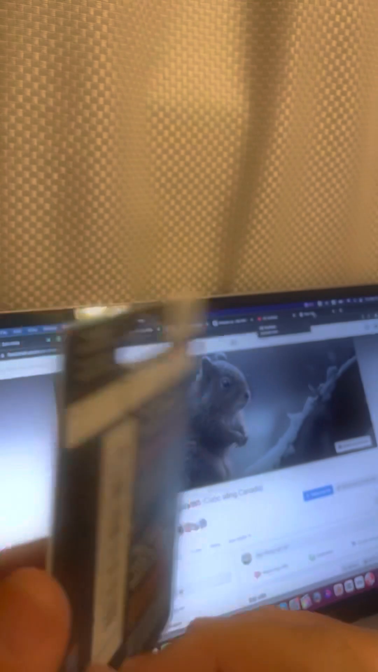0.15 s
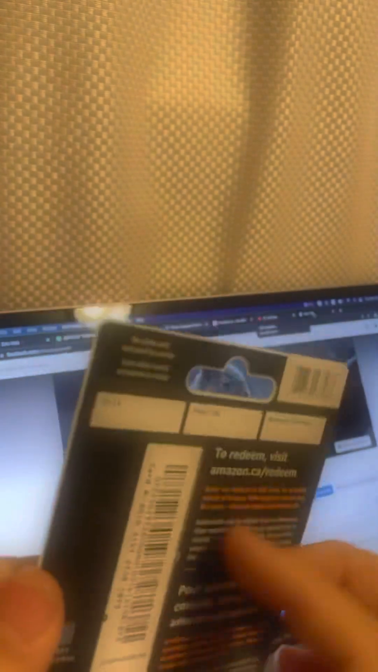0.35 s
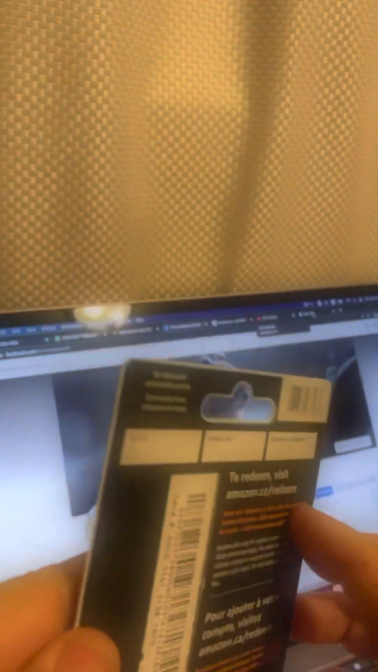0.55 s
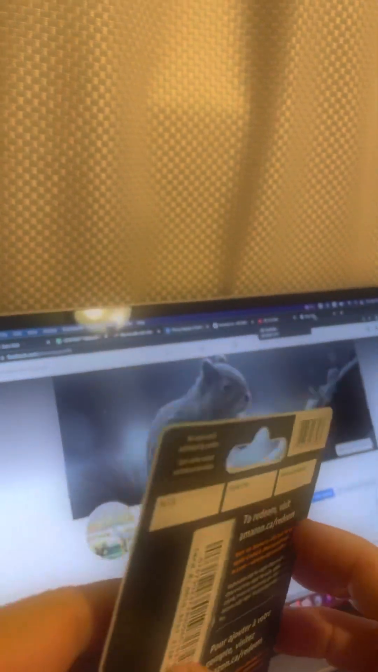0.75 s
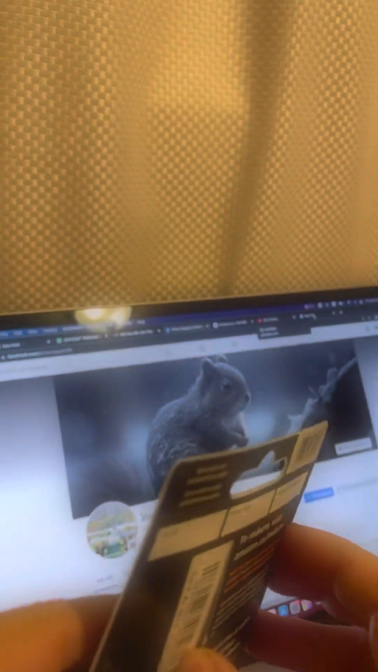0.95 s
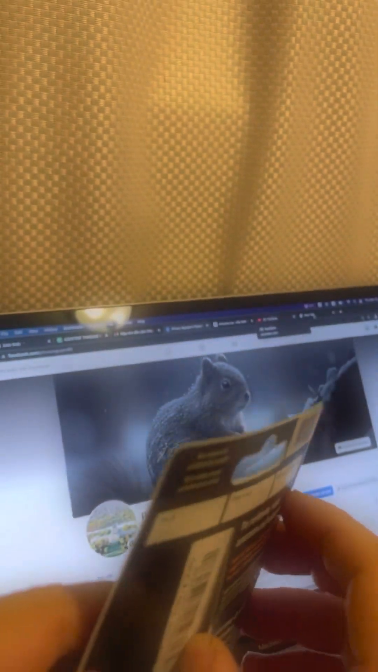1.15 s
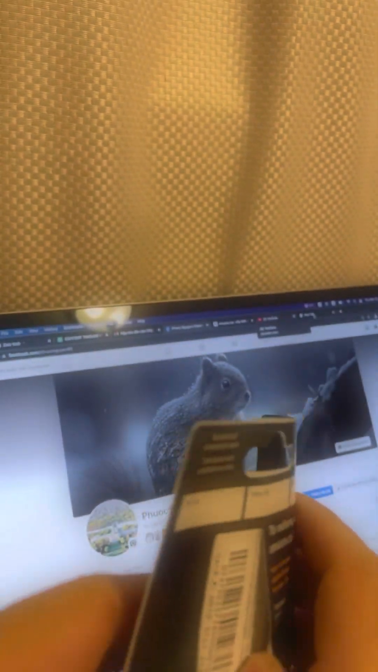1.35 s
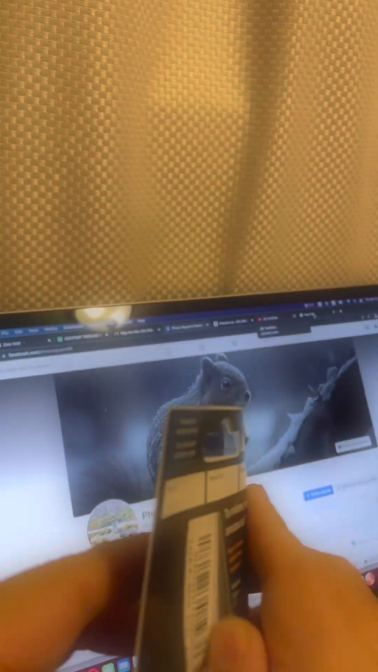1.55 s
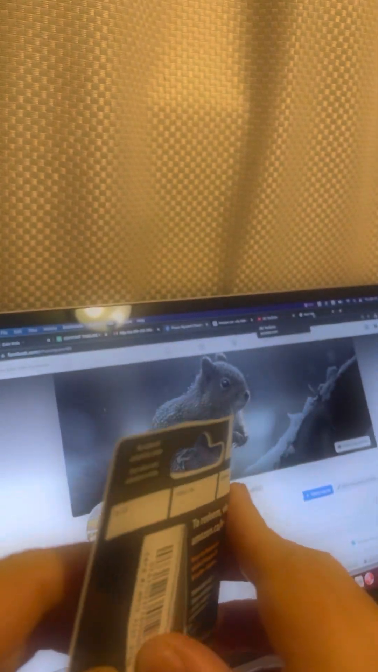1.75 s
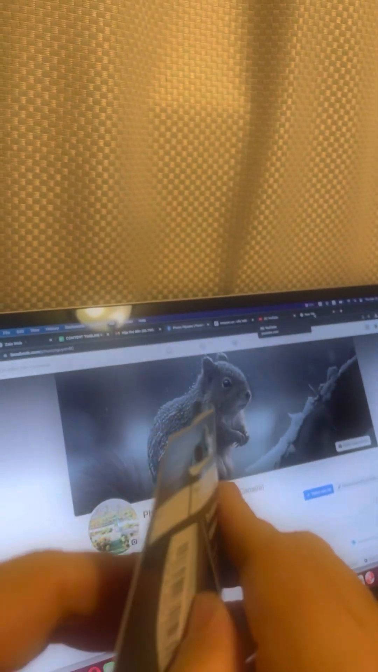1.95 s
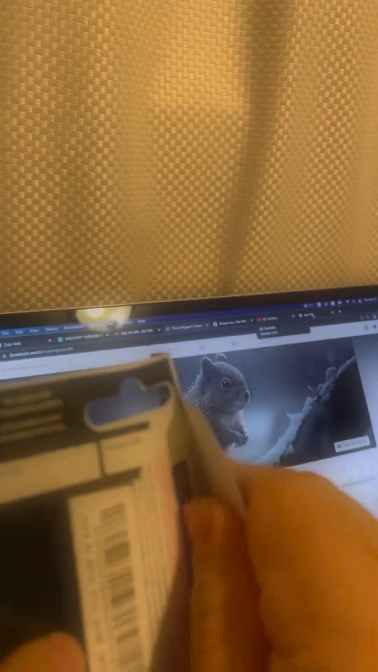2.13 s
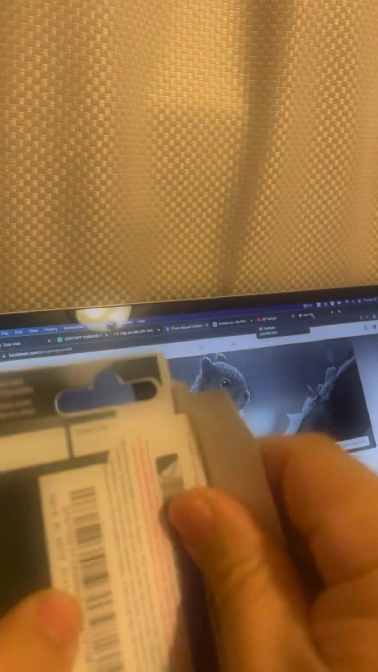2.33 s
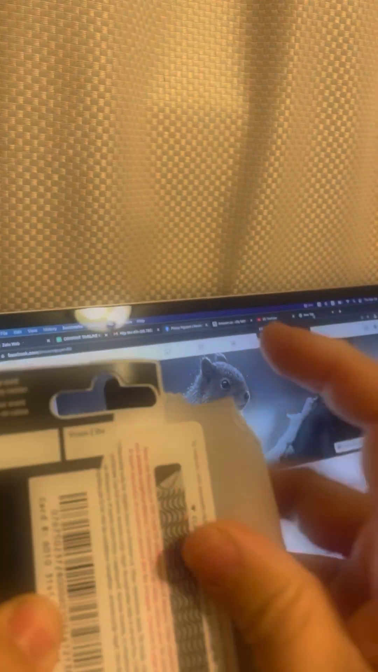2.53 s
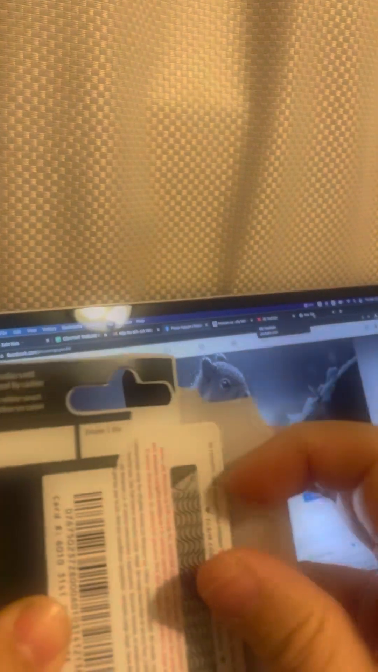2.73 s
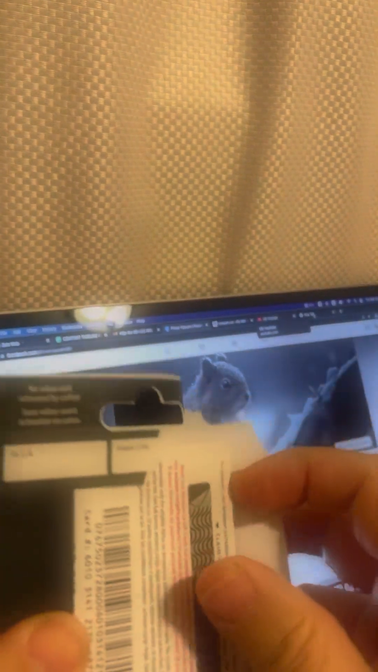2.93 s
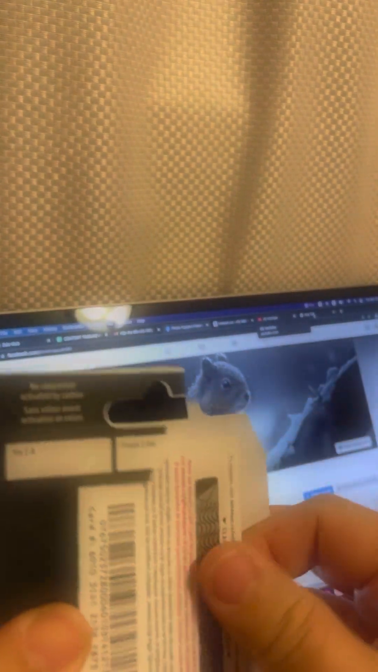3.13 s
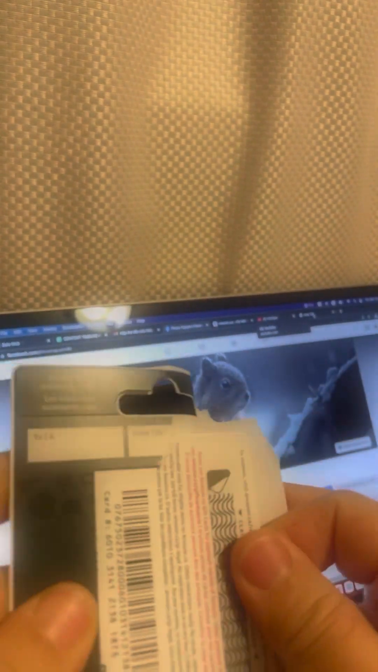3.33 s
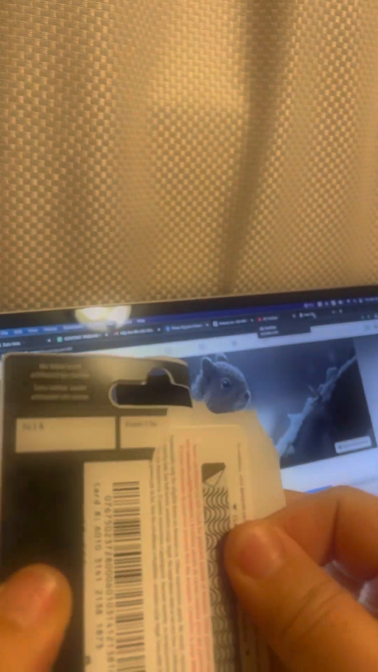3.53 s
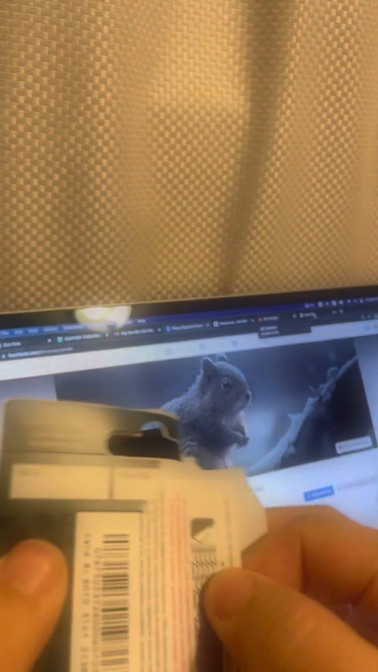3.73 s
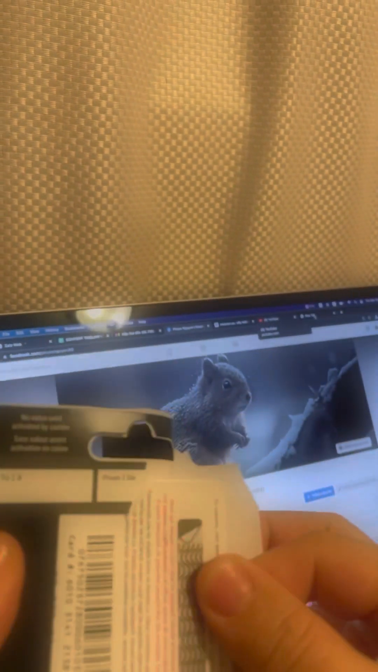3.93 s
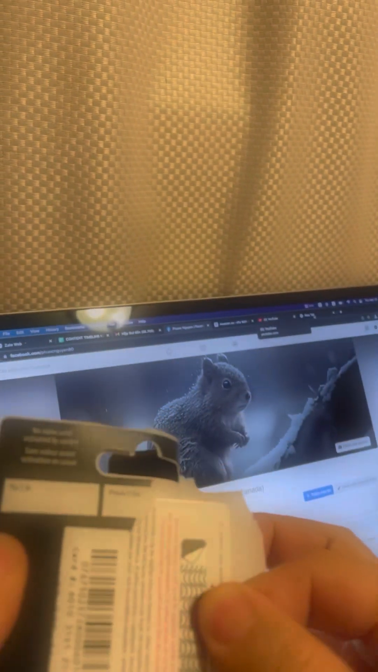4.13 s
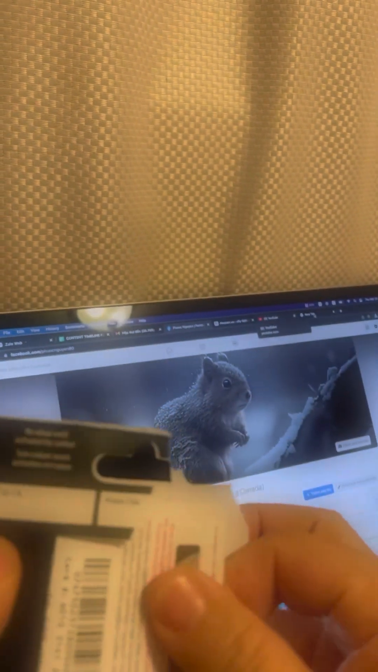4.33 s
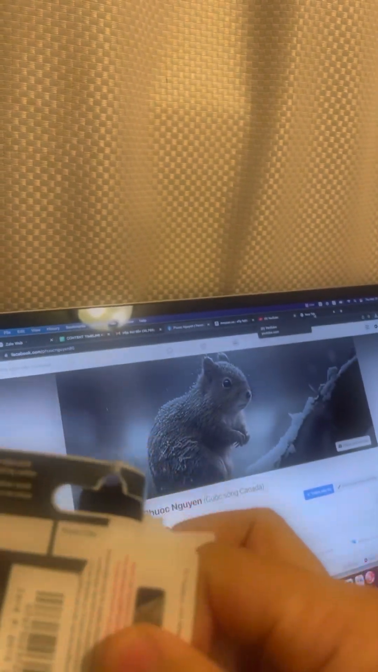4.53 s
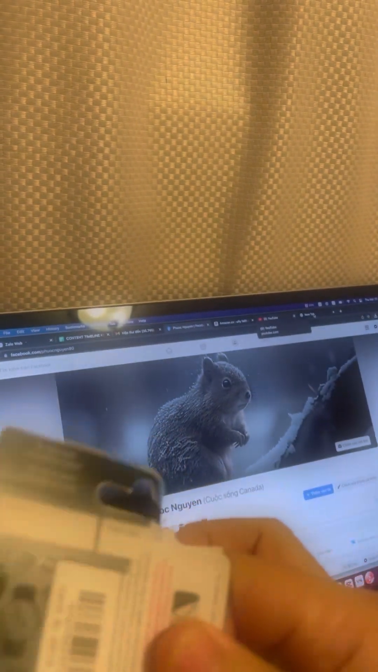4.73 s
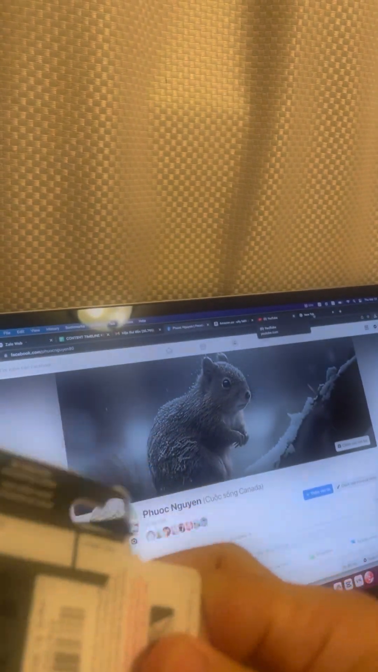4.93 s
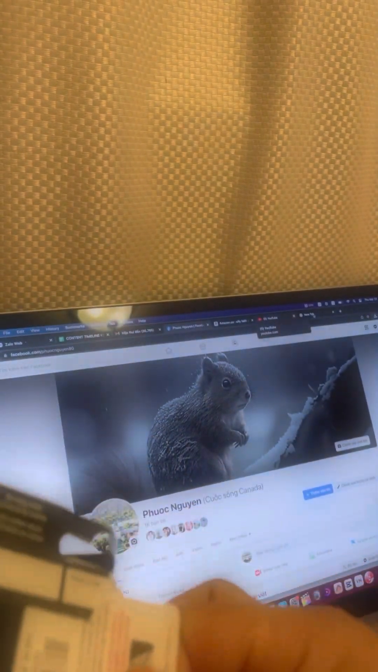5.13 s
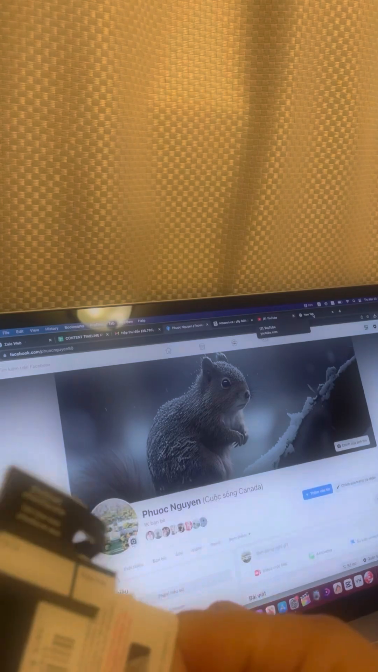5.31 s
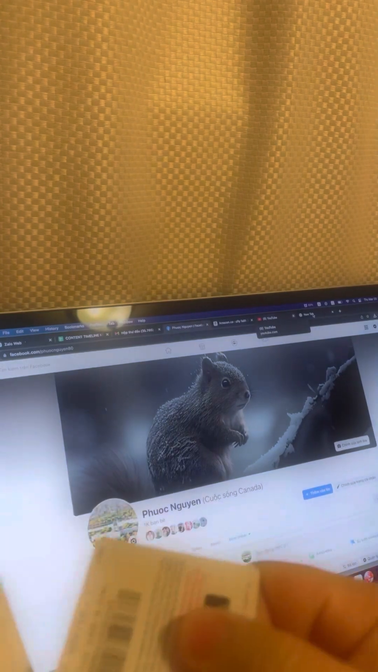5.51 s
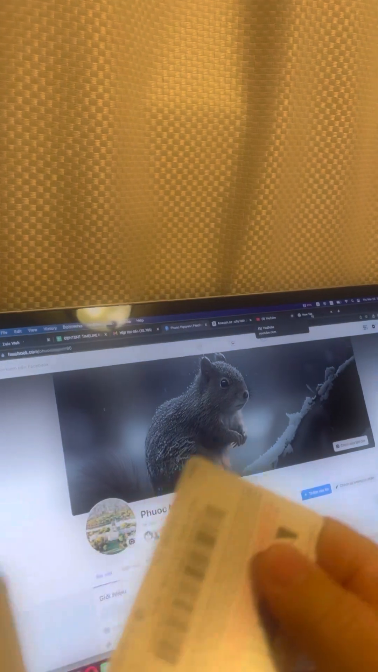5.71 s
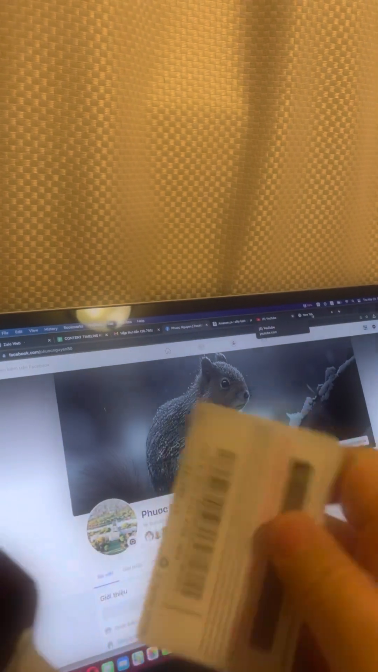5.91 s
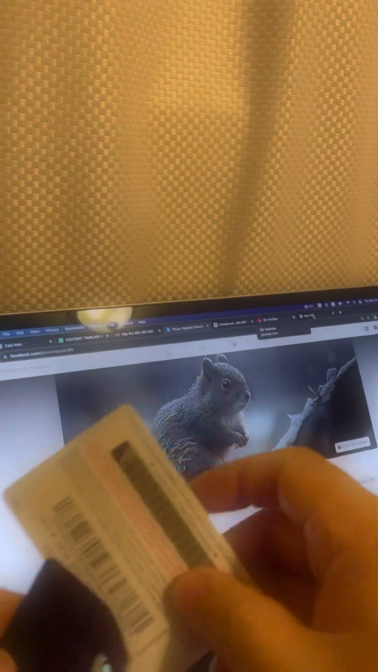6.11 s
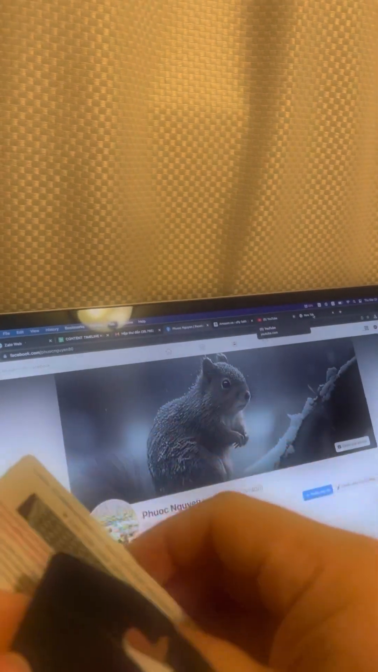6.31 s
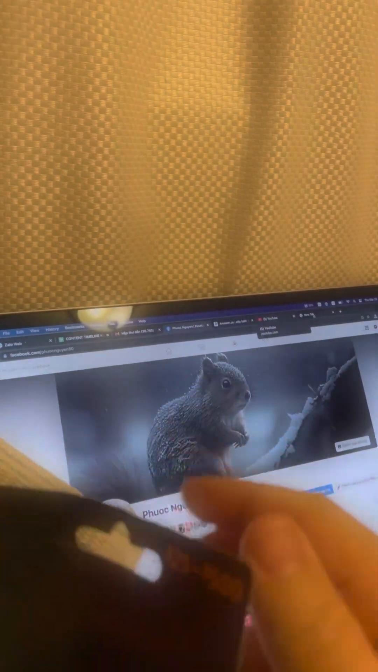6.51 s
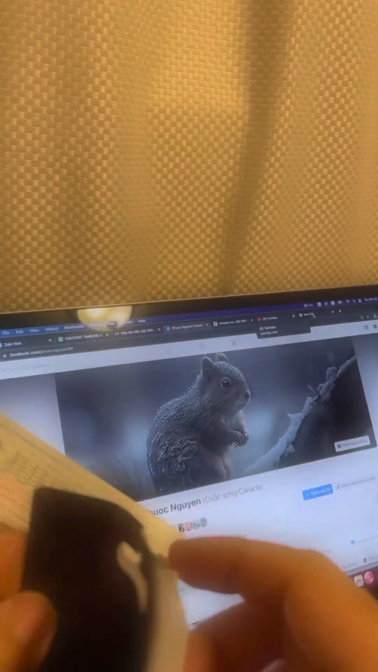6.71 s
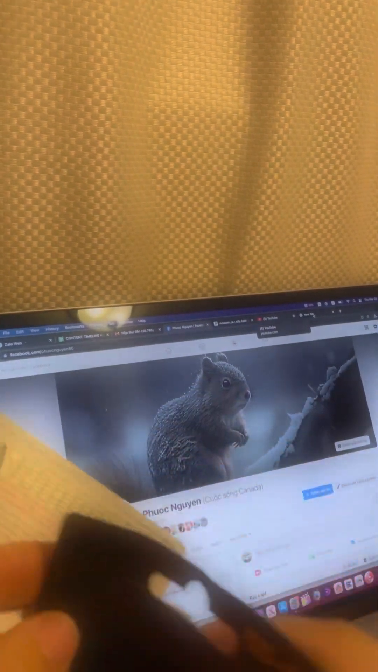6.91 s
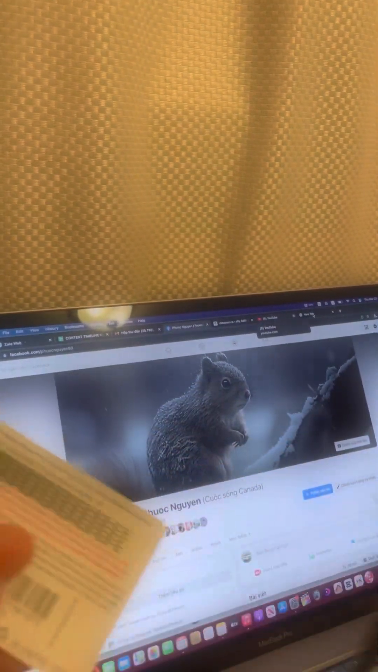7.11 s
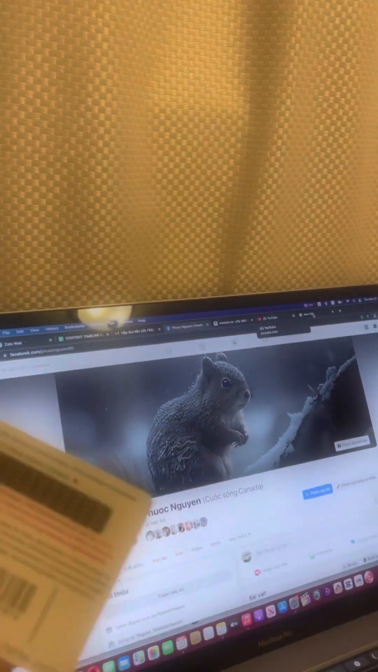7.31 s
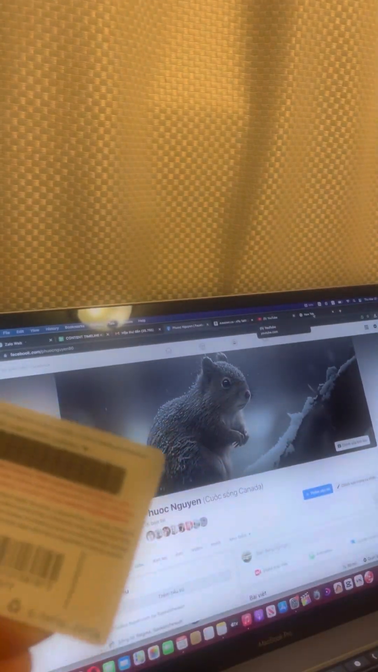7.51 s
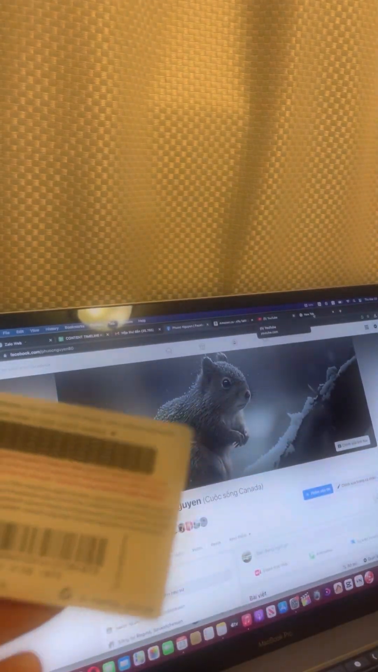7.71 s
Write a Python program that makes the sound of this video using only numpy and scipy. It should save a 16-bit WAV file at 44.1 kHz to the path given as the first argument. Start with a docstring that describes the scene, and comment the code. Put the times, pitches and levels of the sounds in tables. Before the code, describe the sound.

Stiff card packaging is opened by hand, heard very close and dry with faint room reflections. It starts with soft skin rubbing and a few light taps, then two sharp brittle rips in quick succession. Fiddly rubbing and small knocks lead to a moderate crack and finally a loud woody snap as the card comes loose, followed by hissy sliding and scattered clicks.

```python
"""Two hands tear open a stiff paperboard sleeve close to a phone, over the still air of a small room.
Fingers first rub (noise with stick-slip grip) and tap (bursts of fibre noise and ringing modes); the
sheet thumps and the board knocks (fluttering, damped sines). Near 2 s its glued seam gives way in two
rips of jerky crackle; a plastic card is worked loose, snaps free near 5.4 s in a burst of fibre noise
and slides off its backing. Noise echoes add laptop, desk and room; the phone's two ports hear it all."""
import sys
import numpy as np
from scipy import signal
from scipy.fft import rfft, irfft, next_fast_len
from scipy.io import wavfile
from scipy.ndimage import uniform_filter1d, map_coordinates

SR = 44100
rng = np.random.default_rng(int(sys.argv[2]) if len(sys.argv) > 2 else 0)


def file_out(sig):
    """Save sig as 16-bit WAV at sys.argv[1]."""
    # one column per channel
    cols = np.atleast_2d(sig).T
    # limit, then scale
    lim = np.clip(cols, -1, 1)
    pcm = np.round(lim * 32767).astype(np.int16)
    wavfile.write(sys.argv[1], SR, pcm)


N = 346626

# Colour of the still room air: (frequency [Hz], level [dB per Hz])
STILL_SPECTRUM = [(20, -9), (60, -4.5), (250, -6.5), (700, -19.5), (3000, -16), (16000, -20)]
# Colour of the hands' low rumble: (frequency [Hz], level [dB per Hz])
HANDS_SPECTRUM = [(20, -27), (45, 2.5), (80, -3.5), (140, -9.5), (260, -16.5), (700, -46.5)]
# Skin and card sliding on the board, one row a move, levels before the trims in sliding():
# (start [s], end [s], rub level [dB], hiss level [dB])
SLIDES = [(0.064, 0.2, -79, -66.5), (0.214, 0.276, -63.5, -57.5), (0.287, 0.414, -61, -55),
          (0.435, 0.53, -65, -59), (0.526, 0.612, -66, -68), (0.687, 0.825, -82, -77.5),
          (0.943, .96, -84, -81), (1.119, 1.392, -71, -66.5), (1.223, 1.332, -59.5, -57.5),
          (1.464, 1.693, -61, -56), (1.705, 1.846, -70, -70), (1.823, 1.94, -56.5, -60),
          (2.049, 2.19, -53.5, -54), (2.216, 2.41, -56, -65), (2.426, 2.49, -63.5, -71),
          (2.557, 2.648, -58, -68), (2.863, 2.882, -55, -59.5), (2.96, 3.097, -52.5, -70),
          (3.106, 3.27, -66, -70), (3.367, 3.464, -72, -74.5), (3.596, 3.771, -62, -60.5),
          (3.799, 3.84, -54, -61), (3.9, 3.993, -69.5, -72.5), (4.15, 4.262, -64, -66),
          (4.318, 4.358, -53.5, -57), (4.367, 4.454, -51.5, -54), (4.447, 4.58, -55, -56),
          (4.566, 4.713, -57, -60.5), (4.745, 4.808, -50, -58), (4.828, 4.885, -67.5, -69),
          (4.955, 5.161, -70, -68.5), (5.214, 5.419, -57.5, -58.5), (5.473, 5.638, -56.5, -48.5),
          (5.627, 5.706, -55.5, -53), (5.734, 5.885, -67, -65), (5.9, 6.028, -62, -57.5),
          (6.409, 6.469, -62.5, -59), (6.579, 6.738, -65, -56), (6.713, 6.785, -64.5, -63.5),
          (6.902, 6.997, -61.5, -61), (7.061, 7.26, -65, -60), (7.483, 7.539, -84, -69),
          (7.606, 7.682, -55, -59.5), (7.753, 7.782, -63.5, -61)]
# Colour of the rubbing: (frequency [Hz], level [dB per Hz])
RUB_SPECTRUM = [(300, -30), (750, -3.5), (1400, 4), (2100, 1.5), (3400, 2), (4600, -3.5), (7000, -17.5),
                (16000, -51)]
# Colour of the sliding hiss: (frequency [Hz], level [dB per Hz])
HISS_SPECTRUM = [(2000, -24.5), (4500, -5), (5600, -1), (7500, 1), (9800, -7.5), (12000, -2), (14000, -10),
                 (16000, -16.5)]
# Colour of the board drumming under the rub: (frequency [Hz], level [dB per Hz])
DRUM_SPECTRUM = [(70, -10), (170, -2), (300, 4.5), (470, -3.5), (600, 5), (800, -20), (1600, -30.5)]
# How differently the two ports hear the board: (frequency [Hz], relative amount [ratio])
PORT_CONTRAST = [(80, .05), (130, .6), (250, 1), (600, 1.5), (800, 1.5), (1300, .6), (2400, 1.4),
                 (4800, 1.3), (7000, .8), (14000, .6)]
# Colour of the laptop and desk reflections: (frequency [Hz], reflected level [dB])
DESK_COLOUR = [(100, -3.5), (400, 1), (780, 8.5), (1500, -19.5), (2800, 0), (4600, -6.5), (6500, -1.5),
               (10000, -44.5), (16000, -9)]
# Decay of the room: (frequency [Hz], t60 [s])
ROOM_T60 = [(150, 0.25), (1000, 0.76), (3000, 0.13), (8000, 0.13), (16000, 0.34)]
# Colour of the wall reflections: (frequency [Hz], reflected level [dB])
WALL_COLOUR = [(100, -3), (400, -5.5), (600, -4.5), (1100, -8), (2000, -1), (3200, 8.5), (7000, 6),
               (10000, -14), (16000, -7)]
# Fingers and card edges tapping the board, knock before the trim in contacts():
# (time [s], peak level [dB], brightness [dB per octave], knock level [dB])
TAPS = [(0.1083, -55, -2, -79), (0.2102, -39.5, 3, -40), (0.2175, -41.5, -8, -46),
        (0.2465, -41.5, -14, -45), (0.4979, -29, 2, -39), (0.6564, -52.5, -3, -59),
        (.819, -43.5, -3.5, -48), (1.612, -30.5, 3, -49), (1.6259, -33.5, 0, -45),
        (1.6634, -40.5, 0.5, -56.5), (2.136, -40, 3, -64), (2.1851, -37.5, -4, -43.5),
        (2.5486, -31, -8, -48), (2.6197, -45, -4, -58), (2.767, -42.5, 2.5, -51), (2.958, -49, 3, -53),
        (3.6318, -35, -10.5, -46.5), (3.7864, -45, 0, -53), (3.8484, -42.5, -3.5, -48.5),
        (3.9278, -47, -1, -80), (4.136, -40.5, -1.5, -51), (4.3251, -39, -22, -53), (4.381, -48, -20, -48),
        (4.4203, -40.5, -22, -38.5), (4.523, -40, 5, -59), (4.6114, -38, 4.5, -67),
        (4.6417, -38.5, -2, -41.5), (4.6957, -34.5, 2, -49.5), (4.8662, -45, 5.5, -80),
        (5.0606, -51, -5, -67.5), (5.5888, -33, 1.5, -38.5), (5.64, -31.5, 4, -48.5),
        (6.3072, -49.5, -5, -73.5), (6.4494, -28.5, 0, -44), (6.511, -38.5, -2.5, -64),
        (6.557, -42.5, -1.5, -40), (6.639, -41, -0.5, -52), (6.6743, -33.5, 3.5, -41),
        (6.682, -29.5, 2, -44.5), (6.75, -44.5, 3, -50.5), (6.871, -45.5, 4.5, -64), (6.9434, -42, -8, -37),
        (7.086, -42.5, 2, -58), (7.099, -60, -19, -39.5), (7.1541, -42.5, -3.5, -50.5),
        (7.2604, -39, -12.5, -56.5), (7.421, -47.5, -4.5, -79), (7.6138, -36.5, 3.5, -45.5),
        (7.625, -40.5, -2, -47.5), (7.6583, -39.5, 1, -50)]
# Glue and fibres giving way: (time [s], peak level [dB], t60 [s], brightness [dB per octave])
SNAPS = [(1.9892, -9, 0.026, 1), (2.0014, -16.5, 0.054, 4.5), (2.0164, -10.5, .012, 1.5),
         (2.0274, -10.5, 0.037, 0), (2.034, -13, 0.0076, -2.5), (2.2809, -22, .016, -0.5),
         (2.2849, -9.5, 0.014, 1), (2.3332, -14, 0.0088, 1.5), (2.3432, -22, 0.015, 2.5),
         (4.7302, -18.5, 0.012, -9.5), (4.7332, -17, 0.0063, 4.5), (4.7974, -24, 0.0085, 0.5),
         (5.3235, -30, 0.009, 0), (5.3291, -22, 0.021, 1), (5.3513, -30, 0.014, -1),
         (5.389, -23.5, 0.007, 1.5), (5.4123, -41.5, 0.035, 4.5), (5.4306, -19, 0.0064, -5.5),
         (5.4313, -11.5, 0.04, -0.5)]
# Colour of breaking fibres: (frequency [Hz], level [dB per Hz])
CRACK_SPECTRUM = [(100, -28), (300, -6), (490, -5.5), (620, -3), (780, -7), (1100, -0.5), (1900, 1.5),
                  (3400, -0.5), (4700, -4.5), (6200, -3), (9500, -5), (12500, -10), (16000, -23)]
# Bending modes of the board, before random detune and level scatter:
# (frequency [Hz], level [dB], t60 [s])
BOARD_MODES = [(185, -4, 0.032), (227, 2, 0.044), (308.7, 3.5, .045), (399, -8, 0.085), (556, -1.5, 0.069)]
# Low thumps of the flexing sheet and short, higher knocks of the struck board, level before the
# trim in thumps_and_knocks(): (time [s], level [dB], pitch [Hz])
THUMPS_AND_KNOCKS = [(.211, -36, 164), (.248, -45, 187), (0.498, -39, 106), (0.551, -48, 86),
                     (.821, -48, 527), (1.422, -42, 120), (1.587, -38.5, 105), (2.024, -18, 262),
                     (2.186, -37, 214), (2.289, -50, 113), (2.55, -32, 634), (2.89, -40, 332),
                     (2.957, -42, 297), (3.635, -44, 192.6), (3.852, -43.5, 68.2), (4.227, -35.5, 223),
                     (4.388, -47, 230), (4.423, -40.5, 196), (4.734, -22, 187.5), (4.731, -22.5, 77.6),
                     (4.955, -39.5, 87), (5.064, -48.5, 90), (5.441, -21, 78.4), (5.437, -27, 192),
                     (5.433, -11.5, 535), (5.604, -36, 115), (5.606, -35, 460), (6.454, -30, 302),
                     (6.556, -43, 202), (6.676, -54, 169), (6.883, -36.5, 66.2), (6.943, -44, 119),
                     (6.935, -45, 322), (6.963, -36, 78), (7.098, -36, 739), (7.1, -33.5, 106.8)]
# Rips and quick scrapes, level before the trim in strokes():
# (start [s], end [s], level [dB], brightness [dB per octave])
STROKES = [(0.809, 0.843, -52, 6), (1.447, 1.478, -46, 3.5), (1.965, 1.984, -37.5, 6.5),
           (1.981, 2.023, -27, 3), (2.02, 2.041, -21, -0.5), (2.031, 2.043, -35.5, -1.5),
           (2.276, 2.333, -28.5, -2), (2.325, 2.351, -18, 0.2), (2.492, 2.557, -43, 0.5),
           (2.689, 2.707, -40.5, 1), (2.971, 3.098, -40, 3.3), (4.214, 4.257, -48, -4.5),
           (4.703, 4.719, -37, 3), (4.721, 4.742, -28.5, 2.5), (4.769, 4.804, -55, -9),
           (5.321, 5.341, -36.5, 9), (5.395, 5.446, -35, 3), (5.424, 5.445, -41, 10),
           (5.441, 5.473, -36.5, -2), (5.463, 5.524, -36, 1), (5.587, 5.638, -47, -10.5),
           (6.151, 6.203, -55.5, 3), (7.161, 7.238, -45, 2)]
# Phase between the two microphone ports: (frequency [Hz], lead of the left port [rad])
PORT_PHASE = [(450, 0), (660, -.6), (850, .5), (1100, -.1), (2000, .15), (3500, .3), (4300, -.4),
              (4750, -1.9), (5300, 0), (7000, 1.35), (9400, 3.05), (11000, 3.25), (13000, 4.8),
              (14000, 6.2)]

# low rumble: level [dB] at a rub row of -60 dB, dB per dB of rub, inertia [s]
RUMBLE_DB, RUMBLE_FOLLOWS, RUMBLE_LAG_S = -63, 0.34, 0.17
# drumming board: level [dB] at a rub row of -60 dB, dB per dB of rub
DRUM_DB, DRUM_FOLLOWS = -65.5, .65
# fingers merely holding the board, before the trims in sliding()
GRIP_RUB_DB, GRIP_HISS_DB = -83, -87
# time to rise or fall by 20 dB [s]; drop from mid-move to its ends [dB]
SLIDE_ATTACK_S, SLIDE_RELEASE_S, SLIDE_ARCH_DB = 0.037, .045, 3
# faint ticks under sliding fingers: rate [per s], peak and knock over the rub row [dB]
TICKS_PER_S, TICK_DB, TICK_KNOCK_DB = 11, 2.5, -0.5
# their level scatter either way [dB] and brightness [dB per octave]
TICK_SCATTER_DB, TICK_TILT_DB = 5, -6
TAP_T60_S = .019
SNAP_KNOCK_DB = -26  # knock relative to the snap, before the trim in contacts()
# higher and louder thumps and knocks die sooner: t60 [s] at 100 Hz and a row level of -35 dB,
# power of the pitch, dB of t60 lost per dB of level
RING_T60_S, RING_PITCH_POWER, RING_GRIP = .115, 0.72, 0.19
TOP_HZ = 15900  # upper band edge of the phone


def amp(db):
    """Decibels as a linear gain."""
    return 10 ** (np.asarray(db) / 20)


def unit(x):
    """Scale a sound to rms 1."""
    return x / np.sqrt(np.mean(x ** 2) + 1e-20)


def along(points, hz):
    """Read a table of (frequency, value) on a log frequency axis."""
    f, v = np.transpose(points)
    return np.interp(np.log(hz + 1), np.log(f), v)


def random_curve(knots, position):
    """A smooth random curve through the given number of knots, read at knot positions."""
    return map_coordinates(rng.standard_normal(knots), [position])


def wobble(rate):
    """A smooth random curve over the whole scene, rate knots a second."""
    return random_curve(int(N * rate / SR) + 4, np.arange(N) * rate / SR)


def filtered(x, response):
    """Shape a sound with a response given as a function of frequency."""
    m = next_fast_len(N + SR // 2)
    hz = np.fft.rfftfreq(m, 1 / SR)
    return irfft(rfft(x, m) * response(hz), m)[..., :N]


def coloured(x, spectrum):
    """Give a sound the colour of a table, at rms 1."""
    return unit(filtered(x, lambda hz: amp(along(spectrum, hz))))


def add(track, s, sound):
    """Mix a sound into the stereo track at s seconds."""
    part = track[:, max(round(s * SR), 0):][:, :sound.shape[-1]]
    part += sound[..., :part.shape[-1]]


def fibres(size, scatter_db):
    """Dense tiny slips as noise at rms 1, most of them weak and a few strong."""
    strength = np.minimum(rng.exponential(size=size), 4)
    return unit(rng.standard_normal(size) * amp(scatter_db * strength))


def background(rub, still_db=-80):
    """The hands rumble faintly as they move, over the still air of the room."""
    effort_db = uniform_filter1d(rub, int(RUMBLE_LAG_S * SR)) + 60
    rumble_db = RUMBLE_DB + RUMBLE_FOLLOWS * effort_db
    rumble = amp(rumble_db) * coloured(rng.standard_normal(N), HANDS_SPECTRUM)
    still = amp(still_db) * coloured(rng.standard_normal(N), STILL_SPECTRUM)
    return rumble + still


def friction():
    """Rub and hiss curves in dB: each move of the hands sets in, is fastest halfway and dies away."""
    t = np.arange(N) / SR
    rub_power = np.full(N, amp(GRIP_RUB_DB) ** 2)
    hiss_power = np.full(N, amp(GRIP_HISS_DB) ** 2)
    for start, end, rub_db, hiss_db in SLIDES:
        near = slice(max(int((start - .5) * SR), 0), int((end + .5) * SR))
        progress = np.clip((t[near] - start) / (end - start), 0, 1)
        before = np.maximum((start - t[near]) / SLIDE_ATTACK_S, 0)
        after = np.maximum((t[near] - end) / SLIDE_RELEASE_S, 0)
        speed_db = -SLIDE_ARCH_DB * (2 * progress - 1) ** 2 - 20 * (before + after)
        rub_power[near] += amp(rub_db + speed_db) ** 2
        hiss_power[near] += amp(hiss_db + speed_db) ** 2
    return 10 * np.log10(rub_power), 10 * np.log10(hiss_power)


def catches(rate, catch_db, life):
    """Gain of the friction: now and then a ridge of the board snags for an instant."""
    struck = rng.random(N) < rate / SR
    snags = struck * amp(catch_db) * rng.exponential(size=N)
    return 1 + signal.lfilter([1], [1, -np.exp(-1 / (life * SR))], snags)


def patchy(x, patch_db=2.0, port=.7):
    """The board's resonances shift as the grip moves, and reach each port with a wandering phase."""
    hz, t, z = signal.stft(x, SR, nperseg=512)
    grid = np.meshgrid(np.sqrt(hz) / 4, t * 16, indexing="ij")

    def field():
        """A smooth random surface over frequency and time."""
        return map_coordinates(rng.standard_normal((64, 140)), grid)

    phase = port * along(PORT_CONTRAST, hz)[:, None] * np.array([field(), field()])
    shifted = z * amp(patch_db * field()) * np.exp(1j * phase)
    return signal.istft(shifted, nperseg=512)[1][:, :N]


def sliding(rub, hiss, rub_db=4.0, hiss_db=3.0, slip_db=3.0, chatter_db=1.5):
    """Surfaces stick and slip as they slide; one shared grip drives hiss, rub and drumming board."""
    drum = DRUM_DB + DRUM_FOLLOWS * (rub + 60)
    grip = amp(slip_db * wobble(45) + chatter_db * wobble(400))
    grip *= catches(rate=84, catch_db=-2.5, life=0.0035)
    out = np.zeros(N)
    for db, spectrum in [(rub + rub_db, RUB_SPECTRUM), (hiss + hiss_db, HISS_SPECTRUM), (drum, DRUM_SPECTRUM)]:
        out += amp(db) * coloured(grip * fibres(N, scatter_db=2.5), spectrum)
    return patchy(out)


def echoes(x, t60s, colour, delay):
    """Diffuse reflections, different at each port, each frequency dying at its own speed."""
    hz, t, z = signal.stft(rng.standard_normal((2, SR // 2)), SR, nperseg=128)
    decay = amp(-60 * t / along(t60s, hz)[:, None])
    tail = signal.istft(z * decay, SR, nperseg=128)[1]
    tail /= np.linalg.norm(tail, axis=1, keepdims=True)
    wet = signal.fftconvolve(x, tail, axes=1)[:, :N]
    return filtered(wet, lambda hz: amp(along(colour, hz)) * np.exp(-2j * np.pi * hz * delay))


def desk(x, count=4):
    """The paths off the laptop and desk keep changing as the hands move the package."""
    weights = np.array([wobble(7) for _ in range(count)])
    weights /= np.linalg.norm(weights, axis=0)
    return sum(echoes(w * x, [(1000, 0.069)], DESK_COLOUR, delay=0.00074) for w in weights)


def room(x):
    """The walls answer later, as diffuse reflections that die by frequency."""
    return echoes(x, ROOM_T60, WALL_COLOUR, delay=0.0082)


def contact_list(tick_t60=0.004):
    """Ticks by chance, taps and snaps as (time [s], peak [dB], t60 [s], tilt [dB/octave], knock [dB])."""
    rows = [(s, db, t60, tilt_db, db + SNAP_KNOCK_DB) for s, db, t60, tilt_db in SNAPS]
    rows += [(s, db, TAP_T60_S, tilt_db, knock_db) for s, db, tilt_db, knock_db in TAPS]
    for start, end, rub_db, _ in SLIDES:
        length = end - start
        for chance, place, strength in rng.random(size=(8, 3)):
            if chance < TICKS_PER_S * length / 8:
                db = rub_db + TICK_SCATTER_DB * (2 * strength - 1)
                s = start + place * length
                rows.append((s, db + TICK_DB, tick_t60, TICK_TILT_DB, db + TICK_KNOCK_DB))
    return rows


def crack(tilt_db, modes_db=2.5, port_db=1.0, size=1024):
    """The board's causal answer to one breaking fibre, at both ports."""
    hz = np.fft.rfftfreq(size, 1 / SR)
    # every spot on the board has its own resonances, and each port hears them a little differently
    shared, left, right = [random_curve(80, np.sqrt(hz) / 2) for _ in range(3)]
    ripple_db = modes_db * shared + port_db * along(PORT_CONTRAST, hz) * np.array([left, right])
    slope_db = tilt_db * np.log2(np.clip(hz, 1400, 12000) / 3000)
    # folding the cepstrum forward gives minimum phase: the sound starts at once
    cepstrum = irfft(np.log(amp(along(CRACK_SPECTRUM, hz) + slope_db + ripple_db)))
    cepstrum[:, 1:size // 2] *= 2
    cepstrum[:, size // 2 + 1:] = 0
    return irfft(np.exp(rfft(cepstrum)))


def mode_ring(after, rise=0.0017):
    """The board's bending modes ring; each contact favours other modes and the grip detunes them."""
    ring = np.zeros(len(after))
    for hz, level, life in BOARD_MODES:
        decay = amp(level + rng.normal(0, 3) - 60 * after / life)
        ring += decay * np.sin(2 * np.pi * hz * np.exp(rng.normal(0, .07)) * after)
    ring *= 1 - np.exp(-after / rise)
    return ring / np.abs(ring).max()


def contacts(rise=0.00076, knock_db=3, scatter_db=4.5, lead_db=-21, lead_t60=0.047):
    """Each tick, tap or snap is a short avalanche of fibres that also rings the board's modes."""
    out, t = np.zeros((2, N)), np.arange(-SR // 50, SR // 8) / SR
    after = np.maximum(t, 0)
    for s, db, t60, tilt_db, board_db in contact_list():
        # the edge starts to slip just before it lets go
        slip = amp(lead_db - 60 * np.abs(t) / lead_t60) * (t < rise)
        release = np.minimum(after / rise, 1) ** 2 * amp(-60 * after / t60)
        avalanche = fibres(len(t), scatter_db) * np.maximum(slip, release)
        burst = signal.fftconvolve(avalanche[None], crack(tilt_db), axes=1)
        # peak of the short-term rms, over 1.5 ms
        peak = np.sqrt(uniform_filter1d(np.mean(burst ** 2, axis=0), size=66).max())
        add(out, s + t[0], amp(db) * burst / peak)
        add(out, s + t[0], amp(board_db + knock_db) * mode_ring(after))
    return out


def thumps_and_knocks(rise=0.0029, level_db=2, flutter=.25):
    """Each thump or knock rings for a few uneven cycles as a fluttering, damped sine."""
    out, t = np.zeros((2, N)), np.arange(SR // 3) / SR
    for s, db, hz in THUMPS_AND_KNOCKS:
        t60 = RING_T60_S * (100 / hz) ** RING_PITCH_POWER * amp(-RING_GRIP * (db + 35))
        drift, twist = [random_curve(64, t * 150) for _ in range(2)]
        phase = 2 * np.pi * np.cumsum(hz * np.exp(flutter * drift)) / SR
        # the two ports hear the ring with opposite, wandering phase shifts
        ring = np.sin(phase + np.outer([1, -1], .5 * along(PORT_CONTRAST, hz) * twist))
        envelope = (1 - np.exp(-t / rise)) * np.exp(-np.log(1000) * t / t60)
        add(out, s, amp(db + level_db) * ring * envelope)
    return out


def strokes(edge=0.001, soft=0.065, level_db=-0.5, jerk_db=2, arch_db=4, scatter_db=4.5):
    """A running tear or scrape breaks fibres in uneven jerks, fastest in the middle of the pull."""
    out, t = np.zeros((2, N)), np.arange(SR // 5) / SR
    for start, end, db, tilt_db in STROKES:
        length = end - start
        fade = max(edge, soft * length)
        pull = np.clip(np.minimum(t, length + fade - t) / fade, 0, 1)
        pull *= amp(-arch_db * np.minimum(2 * t / length - 1, 1) ** 2)
        jerks = amp(jerk_db * random_curve(128, t * 600))
        slips = jerks * fibres(len(t), scatter_db)
        crackle = unit(signal.fftconvolve(slips[None], crack(tilt_db), axes=1)[:, :len(t)])
        add(out, start, amp(db + level_db) * pull * crackle)
    return out


def scene():
    """The package with its near and far reflections, plus the dry thumps, knocks and background."""
    rub, hiss = friction()
    package = sliding(rub, hiss) + contacts() + strokes()
    near = amp(-7.5) * desk(package)
    far = amp(-20.5) * room(package)
    return background(rub) + package + near + far + thumps_and_knocks()


def record(dry, low_hz=36):
    """The phone's ports hear the sound out of step; it cuts deep bass, rounds peaks, limits the band."""
    ports = filtered(dry, lambda hz: np.exp(.5j * np.outer([1, -1], along(PORT_PHASE, hz))))
    bass_cut = signal.butter(N=3, Wn=low_hz, btype="high", fs=SR, output="sos")
    ports = signal.sosfilt(bass_cut, ports)
    rounded = ports / (1 + np.abs(ports / .9) ** 8) ** (1 / 8)
    return filtered(rounded, lambda hz: 1 / np.sqrt(1 + (hz / TOP_HZ) ** 240))


dry = scene()
out = record(dry)
file_out(out)
```